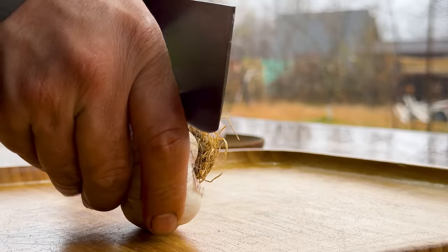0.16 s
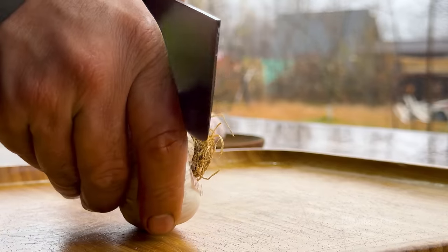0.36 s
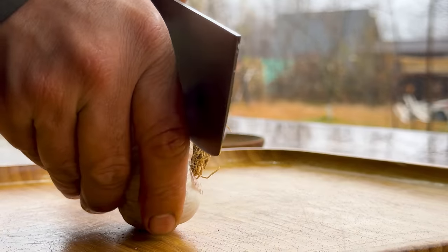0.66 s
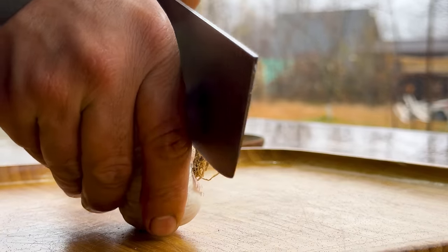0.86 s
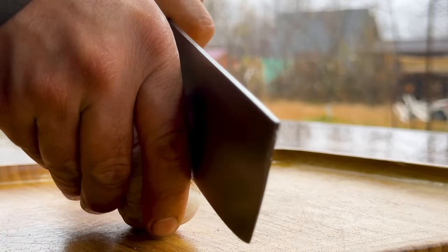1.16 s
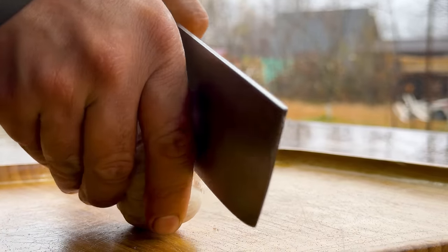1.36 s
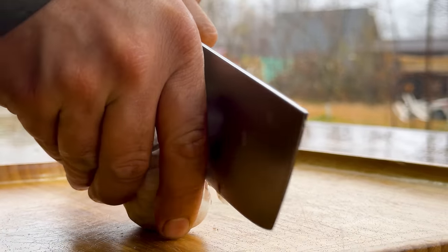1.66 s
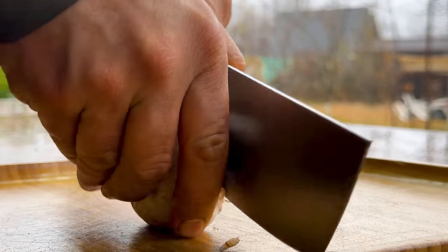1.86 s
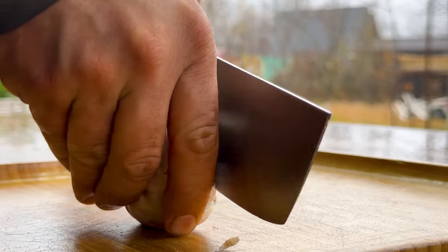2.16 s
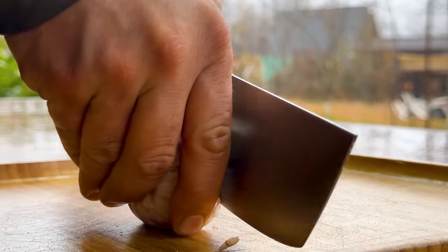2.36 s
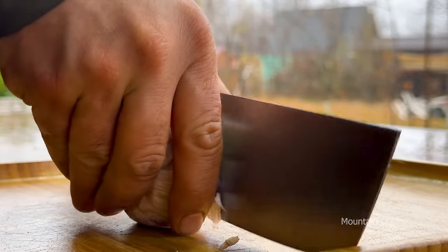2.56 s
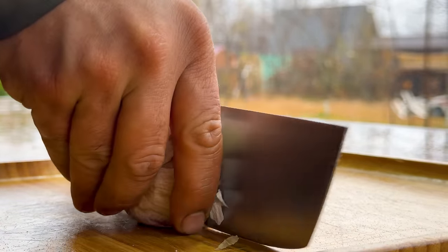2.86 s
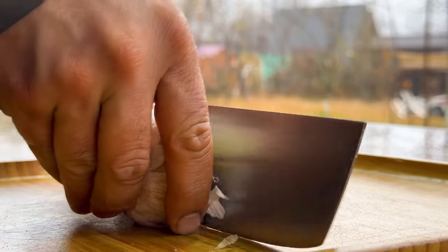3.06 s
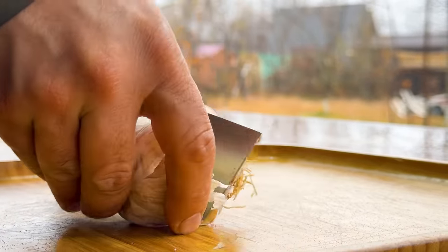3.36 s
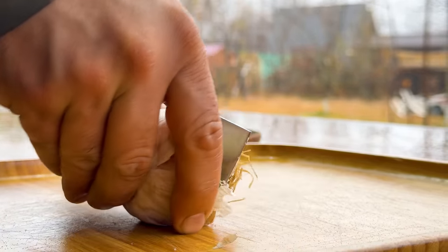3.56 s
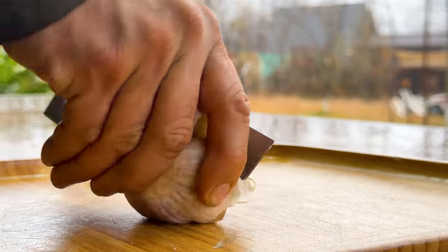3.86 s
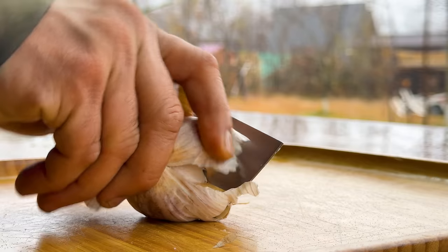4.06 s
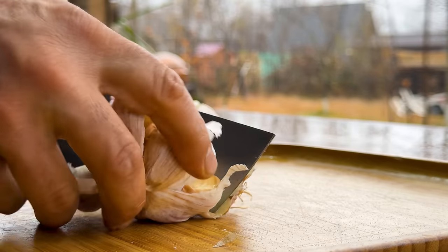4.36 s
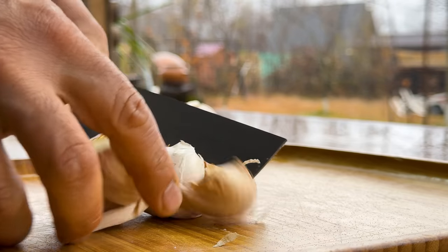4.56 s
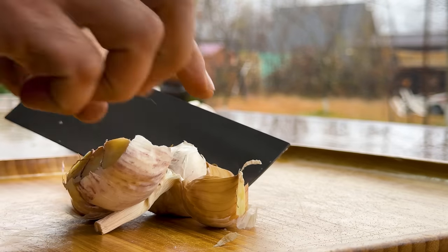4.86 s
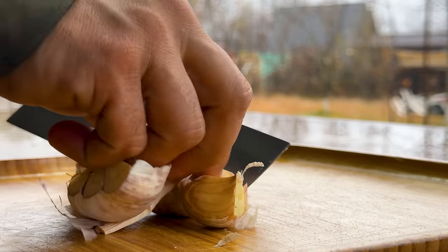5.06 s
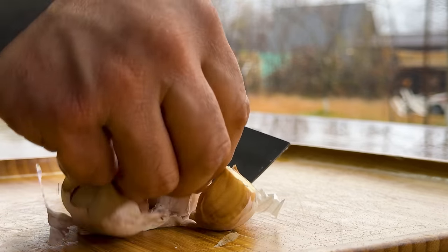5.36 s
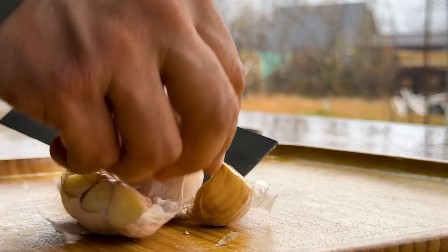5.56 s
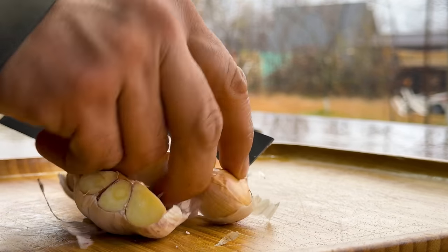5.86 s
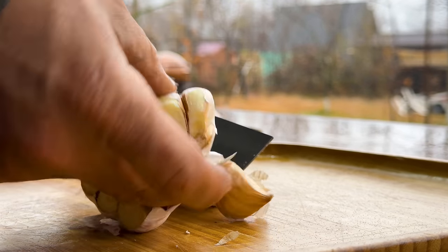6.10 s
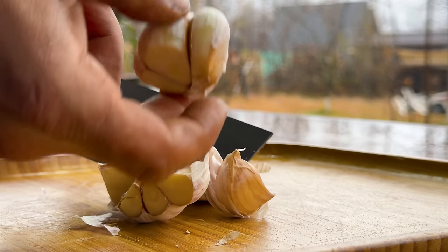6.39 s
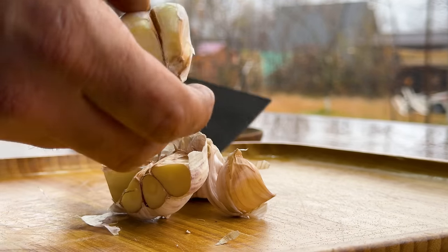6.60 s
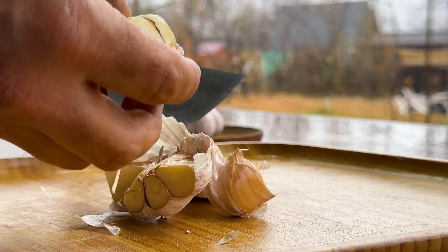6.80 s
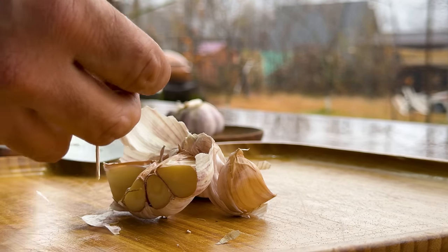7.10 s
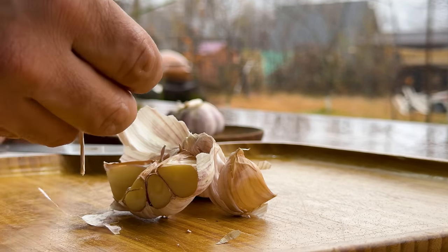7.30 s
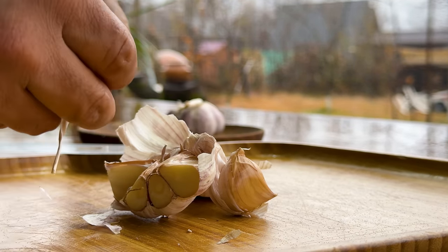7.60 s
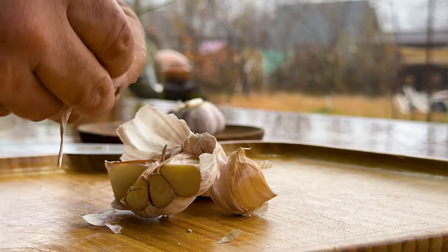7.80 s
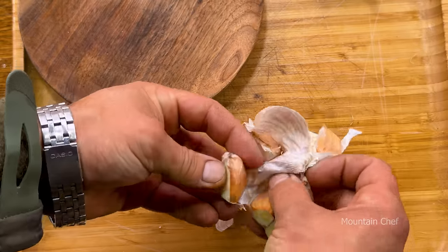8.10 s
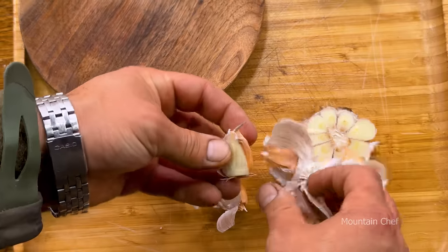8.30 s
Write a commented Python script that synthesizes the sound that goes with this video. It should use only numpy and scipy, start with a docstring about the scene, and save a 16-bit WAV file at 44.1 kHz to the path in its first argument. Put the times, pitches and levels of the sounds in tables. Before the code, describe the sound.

Faint brushing over dry skin opens the scene, then bursts of brittle crunching as a blade bites into garlic, thumping the wooden board beneath. The crackle peaks, thins into papery rustling and a few pops as fingers separate the head, then nearly stops. A knife is put down in a double clatter, followed by a crisp tear and hollow taps on wood. Close, dry and detailed, with only faint room hush.

```python
"""A faint brush over dry skin and a soft tap on wood open the scene, in a quiet room with the microphones close.
A broad knife is then worked down through a dry garlic head on a wooden board: skins crinkle (filtered fibre grains)
and snap (noise bursts with a ringing pop), cloves give way in dull thuds (damped sines), and the board knocks under
blade and handling (struck modes and dense noise). Fingers pull the head apart, the knife is laid aside with a clatter
of wood and steel modes, and soft hollow taps sound on the wood; filtered noise makes room hush and board rumble."""
import sys
import numpy as np
from scipy import signal
from scipy.fft import rfft, irfft, next_fast_len
from scipy.io import wavfile
from scipy.ndimage import uniform_filter1d, map_coordinates

SR = 44100
rng = np.random.default_rng(int(sys.argv[2]) if len(sys.argv) > 2 else 0)


def dump(signal):
    """Clip the signal to [-1, 1] and save it as 16-bit WAV at the path in sys.argv[1]."""
    limited = np.clip(np.atleast_2d(signal).T, -1, 1)
    pcm = np.round(limited * 32767).astype(np.int16)
    wavfile.write(sys.argv[1], SR, pcm)


N = 372204  # samples

# All event levels are relative dB, before the trims in the functions.
# Hush of the quiet room. Each row: frequency in Hz, gain in dB.
AIR_SPECTRUM = [(15, -43), (25, -5), (77, 0.5), (106, -9), (363, -14.5), (1460, -23), (3350, -28.5),
                (15000, -35)]
AIR_DB = -58
# Short answer of the room. Each row: frequency in Hz, time to fall 60 dB in seconds.
ROOM_DECAY = [(100, 0.2), (500, 0.092), (3000, 0.11), (12000, 0.061)]

# Weight of the hand on the board. Each row: time in seconds, level in dB.
HAND_WEIGHT = [(0.0, -59.5), (1.57, -54), (1.67, -49.5), (6.79, -61), (7.36, -56), (7.94, -62), (8.44, -55)]
# Low rumble of the loaded board. Each row: frequency in Hz, gain in dB.
RUMBLE_SPECTRUM = [(15, -30.5), (35, -19.5), (70, -1.5), (110, -7), (170, -8), (300, -33), (900, -63)]
# Creak of the loaded board. Each row: frequency in Hz, gain in dB.
CREAK_SPECTRUM = [(100, -21.5), (220, 2.5), (420, -4.5), (800, -7), (1400, -13), (4000, -19.5)]

# Cloves give way or shift on the board. Each row: start in seconds, level in dB, pitch in Hz.
CLOVE_THUDS = [(1.001, -29, 112.3), (1.043, -26.5, 116.6), (1.1, -28, 124), (1.134, -29, 122),
               (1.571, -33.5, 74), (1.714, -14, 107), (1.75, -23, 70), (1.789, -29, 108),
               (2.242, -29, 112.7), (2.412, -27, 112), (2.805, -24.5, 110), (2.986, -32.5, 82),
               (4.003, -38, 75), (4.07, -38, 85), (4.337, -34.5, 70), (4.572, -41, 199), (7.638, -37, 72),
               (8.345, -40.5, 80.2)]
# Soft hollow taps on the wood, from handling or from cloves put down.
# Each row: start in seconds, level in dB, brightness in Hz.
SOFT_TAPS = [(0.378, -38, 1360), (4.567, -25.5, 778), (4.617, -32, 640), (7.62, -40, 700),
             (8.08, -21.5, 865), (8.312, -17, 724), (8.337, -18, 594), (8.422, -30.5, 750)]
# The knife is laid down. Each row: start in seconds, level in dB, brightness in Hz, blade ring in dB.
KNIFE_LANDINGS = [(7.007, -22.5, 2990, -20), (7.016, -14, 870, -38), (7.027, -31.5, 3460, -38),
                  (7.187, -22.5, 2600, -39), (7.196, -16.5, 1000, -34), (7.229, -11, 4500, -42),
                  (7.234, -11, 3130, -42), (7.246, -17, 3280, -39), (7.262, -18, 2440, -37)]
# Knocks on the board: blade blows, their quick echoes from the board's edges, and low bumps of handling.
# Each row: start in seconds, level in dB, brightness in Hz, contact click in dB.
BOARD_KNOCKS = [(0.823, -38.5, 280, -29), (1.056, -25.5, 320, -21), (1.711, -24.5, 900, 7),
                (1.724, -15.5, 300, -4.5), (1.746, -27, 1190, -5), (2.412, -14.5, 2150, 12),
                (2.423, -15.5, 1180, -4), (2.8028, -12.5, 1280, 7), (2.8164, -17, 980, -19),
                (2.977, -30.5, 1120, 4)]

# Modes of the wood under a soft tap. Each row: frequency in Hz, level in dB, time to fall 60 dB in seconds.
TAP_MODES = [(385.5, -2.5, 0.12), (436, -2.5, 0.09), (562, -9, 0.077), (616, -4.5, 0.066),
             (807, 5.5, 0.013), (1086, -11, 0.039), (1700, -12, 0.032)]
# Modes of the knife on the table. Each row: frequency in Hz, level in dB, time to fall 60 dB in seconds.
KNIFE_MODES = [(204.5, -6.5, 0.14), (261, -9, 0.29), (401, 2, .11), (440, -8.5, 0.19), (619, 1, 0.07),
               (728, -6, 0.11), (823, 7, 0.06), (920, -5.5, 0.095), (1081, -6, 0.11), (1167, -8, 0.12),
               (1424, -1, 0.077), (1735, -7, 0.063), (1730, -3, 0.079), (2170, 0, 0.073),
               (2630, 3.5, 0.055), (2980, -6, 0.062), (3860, -1.5, .035), (11300, -6, 0.068),
               (14000, 11, 0.06)]
# Modes of the steel blade. Each row: frequency in Hz, level in dB, time to fall 60 dB in seconds.
BLADE_MODES = [(2670, 8, 0.37), (8900, -31, .4)]
# Modes of the board. Each row: frequency in Hz, level in dB, time to fall 60 dB in seconds.
BOARD_MODES = [(205.1, -5.5, 0.23), (265, -6, 0.2), (344, -7, 0.14), (423.4, -0.5, 0.11), (513, -16, 0.017),
               (611, 4, 0.062), (722, -2, 0.1), (822, -5, 0.041), (954, -2.5, 0.079), (1046, 5.5, 0.039),
               (1306, -4, 0.081), (1375, -2, 0.042), (2670, -9.5, .035)]
# Dense wash of weaker wood modes. Each row: frequency in Hz, gain in dB.
WOOD_SPECTRUM = [(50, -21), (110, 0.5), (200, 0), (400, -5), (1000, -1), (1700, 0), (2800, 4.5),
                 (6000, 0.5), (15000, -11.5)]
# Dying of that wash. Each row: frequency in Hz, time to fall 60 dB in seconds.
WOOD_DECAY = [(100, 0.32), (400, 0.18), (1000, 0.074), (3000, 0.054), (10000, 0.084)]
# Stereo width of wood sounds. Each row: frequency in Hz, side level in dB.
WOOD_WIDTH = [(120, -7), (260, -3.5), (500, -15.5), (1000, -5.5), (3000, -11), (8000, -23)]

# Blade or fingers slide smoothly over the skin.
# Each row: start in seconds, length in seconds, hiss in dB, husk rubbing in dB, load on the board in dB.
SKIN_SLIDES = [(0, 0.24, -65, -66, -75), (.7, 0.19, -61.5, -63.5, -68), (1.31, 0.24, -52, -60.5, -60.5),
               (2.11, 0.2, -55.5, -60, -57), (2.58, 0.12, -42.5, -53, -68), (3.05, 0.12, -44.5, -49.5, -50),
               (3.19, 0.078, -54, -65, -53.5), (4.12, 0.095, -48.5, -54, -60),
               (4.6, 0.21, -63, -62.5, -62.5), (4.84, 0.24, -49, -52.5, -57.5),
               (5.66, 0.12, -48, -54.5, -58), (6.08, 0.1, -59, -61, -63), (7.58, 0.19, -61.5, -69, -59)]
# Fingers pull at the skins. Each row: start in seconds, length in seconds, level in dB.
SKIN_PULLS = [(4.2, 0.15, -46), (4.39, .22, -51.5), (4.49, 0.029, -41.5), (4.72, 0.051, -57.5),
              (5.085, 0.052, -36), (5.18, .075, -48), (5.3, 0.062, -39.5), (5.44, 0.12, -54),
              (5.76, 0.32, -45.5), (5.81, 0.1, -42), (5.93, .11, -53), (6.19, 0.13, -49.5),
              (6.4, 0.26, -66.5), (7.84, 0.083, -47), (7.98, 0.43, -51.5), (8.075, 0.018, -48),
              (8.133, 0.017, -48), (8.3, 0.017, -47.5)]
# The knife bites into the head.
# Each row: start in seconds, length in seconds, crinkle in dB, husk rubbing in dB, load on the board in dB.
KNIFE_CUTS = [(1.034, 0.014, -35, -45.5, -36.5), (1.085, 0.044, -39, -55, -38),
              (1.15, 0.0083, -57, -70, -60), (1.55, 0.13, -44.5, -49, -45), (1.67, .03, -42, -42, -44),
              (1.708, 0.025, -34.5, -34.5, -33), (1.835, 0.053, -43, -49, -52),
              (1.92, 0.051, -42.5, -50, -51.5), (2.05, 0.037, -46.5, -52, -47),
              (2.225, 0.16, -42.5, -50, -43), (2.38, 0.081, -34.5, -40, -37.5),
              (2.55, 0.027, -35.5, -42.5, -66.5), (2.793, 0.052, -36, -39.5, -40),
              (2.87, 0.072, -47, -49, -54), (3.5, .21, -40.5, -43, -49), (3.735, 0.099, -40, -40.5, -49.5),
              (3.87, 0.058, -39, -40.5, -57), (3.95, 0.15, -45, -45, -50)]
# How a slide, pull or cut starts and dies away. Each pair: attack in seconds, release in dB per second.
SLIDE_SHAPE = (0.02, 205)
PULL_SHAPE = (0.0064, 269)
CUT_SHAPE = (0.0026, 343)
# Husk rubbing and board load of each pull, relative to its crinkle.
PULL_RUB_DB, PULL_LOAD_DB = -2, -17.5
# Fibres break in slow and quick clumps.
SLOW_CLUMP_DB, QUICK_CLUMP_DB = 2.1, 1.5

# Papery crinkle. Each row: frequency in Hz, gain in dB.
PAPER_SPECTRUM = [(300, -23), (1500, -19), (3000, -11), (5000, -3.5), (7300, 0.5), (11000, 3.5), (15000, 2)]
# Hollow husk. Each row: frequency in Hz, gain in dB.
HUSK_SPECTRUM = [(200, -25), (600, -4), (1100, -3), (1600, -7.5), (2300, 0.5), (3000, 4.5), (4000, 0),
                 (6000, 0), (12000, -35.5)]
# Sharp crack of a tear. Each row: frequency in Hz, gain in dB.
CRACK_SPECTRUM = [(150, -30.5), (600, -22), (2000, -13.5), (4500, -8.5), (7500, 2), (11000, 1),
                  (15000, -0.5)]

# A skin or stalk snaps loudly.
# Each row: time in seconds, crack in dB, husk ring in dB, husk pitch in Hz, tearing time in seconds.
LOUD_SNAPS = [(.826, -40, -57, 2993, .005), (.934, -41, -54, 3050, 0.0039),
              (.985, -31.5, -49, 4970, 0.0088), (1.035, -28, -45, 3460, .006), (1.17, -31, -53, 3030, .005),
              (1.443, -40, -69, 3000, 0.0027), (1.5547, -24.5, -28, 2900, 0.0047),
              (1.612, -18.5, -45, 4590, 0.0042), (1.6896, -15.5, -23, 3130, 0.0098),
              (1.709, -12.5, -20.5, 2470, 0.015), (1.746, -13, -18, 4770, .014),
              (1.9182, -20.5, -33.5, 5000, 0.0055), (1.9485, -42, -36.5, 4750, 0.0087),
              (2.2312, -28, -40, 2910, 0.0069), (2.2444, -24, -38, 2507, 0.0085),
              (2.3194, -22, -34.5, 2490, .005), (2.328, -25, -37, 2950, 0.0053),
              (2.3603, -22, -42, 2345, 0.005), (2.3776, -23, -38, 5000, 0.0061),
              (2.399, -14, -20.5, 2750, 0.018), (2.48, -26, -33, 4730, 0.0071),
              (2.55, -36, -32, 3100, 0.0073), (2.5655, -23, -27.5, 3240, 0.015),
              (2.8035, -17, -18, 2800, 0.0054), (2.8303, -22, -42, 3000, .005),
              (2.877, -26.5, -31, 3030, 0.012), (2.904, -25, -28.5, 3100, 0.0075),
              (3.304, -35.5, -41.5, 2760, 0.0043), (3.337, -34.5, -41, 2910, 0.0069),
              (3.4043, -42, -42.5, 3270, 0.0047), (3.4792, -28, -24.5, 2600, 0.0091),
              (3.59, -18.5, -26.5, 4660, 0.0036), (3.6177, -36, -23.5, 4870, 0.0047),
              (3.663, -22.5, -18, 2300, 0.0052), (3.741, -12.5, -22, 4700, 0.027),
              (3.76, -14, -24, 3040, .012), (3.801, -11, -21, 2756, 0.023),
              (3.8515, -17, -23, 2190, 0.0031), (3.8704, -24, -25, 3810, .004),
              (3.88, -21, -25.5, 2307, 0.0044), (3.939, -18.5, -28.5, 3910, .003),
              (4.0384, -22, -27, 4560, 0.0058), (4.0579, -19.5, -30, 3000, 0.0062),
              (4.0772, -25, -30, 3420, 0.017), (4.0917, -32, -28, 3550, .004),
              (4.1063, -34, -30, 1300, 0.0039), (5.1289, -24, -28.5, 3270, .01),
              (5.1597, -26.5, -30.5, 2675, 0.0067), (5.2975, -27.5, -28.5, 3420, 0.0059),
              (6.0417, -26, -31.5, 3000, 0.0038), (6.64, -49, -51.5, 3000, 0.0037),
              (6.838, -45, -78, 1850, .003), (7.899, -17, -26, 2270, 0.014),
              (8.079, -33, -32, 1735, 0.0077), (8.135, -28.5, -33.5, 3280, 0.013),
              (8.162, -24, -34.5, 1696, .014)]
# The skin sticks and slips in a quick run of snaps.
# Each row: start in seconds, length in seconds, slips per second, level in dB.
SLIP_RUNS = [(1.629, .055, 100, -28), (1.828, .052, 112, -26), (2.75, .045, 75, -30.5),
             (2.931, .14, 45, -38), (3.437, .1, 75, -34), (4.215, .09, 30, -35.5), (7.809, .025, 90, -44.5),
             (7.847, .045, 90, -42), (7.984, .08, 55, -37), (8.184, .06, 50, -38)]
# Timing scatter as a part of the slip period, level scatter, husk level relative to the crack.
SLIP_UNEVEN, SLIP_SCATTER_DB, SLIP_HUSK_DB = .3, 4, -9
# Chances of a small snap per second, kept only while the skins are worked; crack level above the work.
SMALL_CHANCES_PER_S, SMALL_SNAP_DB = 60, 1.5
# Level scatter, husk level relative to the crack.
SMALL_SCATTER_DB, SMALL_HUSK_DB = 6, -6
HUSK_HZ = 3030  # middle pitch of slips and small snaps

TOP_HZ = 15850  # upper limit of the microphones


def amp(db):
    """Decibels to gain."""
    return 10 ** (np.asarray(db) / 20)


def unit(x):
    """Scale to rms 1."""
    return x / np.sqrt(np.mean(x ** 2) + 1e-20)


def along(points, hz):
    """Read (Hz, value) points on a log frequency axis."""
    f, v = np.transpose(points)
    return np.interp(np.log(hz + 1), np.log(f + 1), v)


def curves(rows):
    """One value per sample for each column after the time."""
    s, *cols = np.transpose(rows)
    return [np.interp(np.arange(N) / SR, s, c) for c in cols]


def wobble(rate):
    """A smooth random curve with rate knots a second."""
    knots = rng.standard_normal(int(N * rate / SR) + 4)
    return map_coordinates(knots, [np.arange(N) * rate / SR])


def filtered(x, response):
    """x through a response of frequency."""
    n = x.shape[-1]
    m = next_fast_len(n + 4096)
    return irfft(rfft(x, m) * response(np.fft.rfftfreq(m, 1 / SR)), m)[..., :n]


def coloured(x, gain, size=2048):
    """x through the causal minimum-phase filter with this gain, so attacks stay sharp."""
    cepstrum = irfft(np.log(gain(np.fft.rfftfreq(size, 1 / SR)) + 1e-6))
    # folding the cepstrum onto positive times gives minimum phase
    cepstrum[1:size // 2] *= 2
    cepstrum[size // 2 + 1:] = 0
    impulse = irfft(np.exp(rfft(cepstrum)))
    return signal.fftconvolve(x, impulse[None], axes=1)[:, :x.shape[1]]


def spread(pair, side_db):
    """Left and right from a middle signal and a side signal at its own level."""
    mid, side = pair[0], amp(side_db) * pair[1]
    return np.array([mid + side, mid - side])


def wide(pair):
    """Left and right of wood, with a width that depends on frequency."""
    side = coloured(pair[1:], lambda hz: amp(along(WOOD_WIDTH, hz)))[0]
    return np.array([pair[0] + side, pair[0] - side])


def add(track, s, sound):
    """Mix a sound in at time s."""
    start = max(round(s * SR), 0)
    part = track[:, start:start + sound.shape[1]]
    part += sound[:, :part.shape[1]]


def strokes(rows, edges, column=2):
    """Gain of a row of strokes: each rises, holds for its length and dies away."""
    attack_s, release_db_per_s = edges
    t, gain = np.arange(SR) / SR, np.zeros((1, N))
    for row in rows:
        release = amp(-release_db_per_s * np.maximum(t - row[1], 0))
        shape = (1 - np.exp(-t / attack_s)) * release
        add(gain, row[0], amp(row[column]) * shape[None])
    return gain[0]


def dying_noise(t60s, size):
    """Two noises in which each frequency dies at its own speed."""
    hz, t, z = signal.stft(rng.standard_normal((2, size)), SR, nperseg=128)
    fade = amp(-60 * t / along(t60s, hz)[:, None])
    return signal.istft(z * fade, SR, nperseg=128)[1][:, :size]


def air():
    """The steady hush of the room: shaped noise."""
    hush = unit(filtered(rng.standard_normal((2, N)), lambda hz: amp(along(AIR_SPECTRUM, hz))))
    return amp(AIR_DB) * spread(hush, side_db=-11.5)


def room(x):
    """A short answer from the room: the sound convolved with dying noise."""
    tail = dying_noise(ROOM_DECAY, SR // 2)
    tail = tail / np.linalg.norm(tail[0])
    return signal.fftconvolve(x.mean(axis=0)[None], tail, axes=1)[:, :N]


def load():
    """The board rumbles and creaks under the leaning hand, and more with each stroke."""
    lean = amp(curves(HAND_WEIGHT)[0])
    push = strokes(KNIFE_CUTS, CUT_SHAPE, column=4) + strokes(SKIN_SLIDES, SLIDE_SHAPE, column=4)
    push = push + amp(PULL_LOAD_DB) * strokes(SKIN_PULLS, PULL_SHAPE)
    rumble = unit(filtered(rng.standard_normal((2, N)), lambda hz: amp(along(RUMBLE_SPECTRUM, hz))))
    uneven = rng.standard_normal((2, N)) * amp(2.8 * wobble(90))
    creak = unit(coloured(uneven, lambda hz: amp(along(CREAK_SPECTRUM, hz))))
    rumble_gain = np.hypot(lean, amp(-1.5) * push)
    creak_gain = np.hypot(amp(-3.5) * lean, amp(-.5) * push)
    return rumble_gain * spread(rumble, side_db=-12.0) + creak_gain * wide(creak)


def ring(modes, t, vary_db):
    """Two views of an object's decaying modes, struck at new strengths."""
    hz, db, t60 = np.transpose(modes)[:, :, None]
    gain = amp(db + vary_db * rng.standard_normal(hz.shape) - 60 * t / t60)
    phase = rng.random((2, len(modes), 1))
    return np.sum(gain * np.sin(2 * np.pi * (hz * t + phase)), axis=1)


def contact(hz, bright_hz):
    """A softer contact, with lower brightness, passes less treble."""
    return 1 / np.sqrt(1 + (hz / bright_hz) ** 5)


def wood_blow(modes, t, bright_hz, modes_db, dense_db):
    """A wooden slab answers with its main modes and a dense wash of weaker ones."""
    dense = coloured(dying_noise(WOOD_DECAY, len(t)), lambda hz: amp(along(WOOD_SPECTRUM, hz)))
    main = ring(modes, t, vary_db=1.2)
    return coloured(amp(modes_db) * main + amp(dense_db) * dense, lambda hz: contact(hz, bright_hz))


def taps():
    """Soft contacts, from handling or cloves put down, sound the wood modes as small hollow taps."""
    out, t = np.zeros((2, N)), np.arange(SR // 4) / SR
    for s, db, bright_hz in SOFT_TAPS:
        body = wood_blow(TAP_MODES, t, bright_hz, modes_db=-9, dense_db=0)
        add(out, s, amp(db) * spread(body, side_db=-14))
    return out


def clatter():
    """The knife strikes the table several times as it is laid down; wood and thin steel modes ring."""
    out, t = np.zeros((2, N)), np.arange(SR // 2) / SR
    for s, db, bright_hz, ring_db in KNIFE_LANDINGS:
        steel = amp(-11) * ring(BLADE_MODES, t, vary_db=1)
        wood = wood_blow(KNIFE_MODES, t, bright_hz, modes_db=-10.0, dense_db=2.5)
        add(out, s, amp(db - 2.0) * wide(wood + amp(ring_db) * steel))
    return out


def thuds():
    """Each sudden yielding or shift of the cloves pushes the board into a damped low swing."""
    out, t = np.zeros((2, N)), np.arange(SR // 4) / SR
    for s, db, pitch_hz in CLOVE_THUDS:
        onset = (1 - np.exp(-t / 0.0047)) ** 2
        swing = np.sin(2 * np.pi * pitch_hz * t) * amp(-60 * t / 0.11) * onset
        add(out, s, amp(db + 7.0) * swing * amp([[-2.5], [2.2]]))  # stronger on the right
    return out


def knocks():
    """Blade blows, their edge echoes and handling bumps: each a short push with the ringing of the wood."""
    out, t = np.zeros((2, N)), np.arange(SR // 3) / SR
    for s, db, bright_hz, click_db in BOARD_KNOCKS:
        push = np.sin(2 * np.pi * bright_hz * t) * np.exp(-t * bright_hz)
        body = wood_blow(BOARD_MODES, t, bright_hz, modes_db=-8, dense_db=4.5)
        add(out, s, amp(db) * (wide(body) + amp(click_db + 1.5) * push))
    return out


def grains(rate, pitch_hz, cycles, scatter_db, size=64):
    """Two streams of tiny fibre breaks, each a damped sine of its own pitch and strength."""
    count = int(rate * N / SR)
    when, strength, phase, other = rng.random((count, 4)).T
    hz = np.clip(pitch_hz * np.exp(0.5 * rng.standard_normal(count)), 500, SR / 2.2)[:, None]
    turns = hz * np.arange(size) / SR
    level = amp(scatter_db * np.minimum(-np.log(1 - strength), 5))
    fade = level[:, None] * np.exp(-turns / cycles)
    at = ((when * N).astype(int)[:, None] + np.arange(size)).ravel()
    streams = []
    for p in (phase, other):
        breaks = fade * np.sin(2 * np.pi * (turns + p[:, None]))
        streams.append(np.bincount(at, breaks.ravel(), N)[:N])
    return np.array(streams)


def patchy(x, depth_db):
    """Each flake of skin favours its own pitches for a moment: a smoothed random gain field."""
    z = signal.stft(x, nperseg=512)[2]
    field = uniform_filter1d(rng.standard_normal(z.shape[1:]), size=5, axis=0)
    field = uniform_filter1d(field, size=6, axis=1)
    return signal.istft(z * amp(depth_db * unit(field)), nperseg=512)[1][:, :N]


def skins():
    """Dry skins crinkle in clumps under knife and fingers, and hiss evenly where these only slide."""
    cut, pull = strokes(KNIFE_CUTS, CUT_SHAPE), strokes(SKIN_PULLS, PULL_SHAPE)
    clumps = amp(SLOW_CLUMP_DB * wobble(70) + QUICK_CLUMP_DB * wobble(330) - 0.93)

    paper = grains(rate=4500, pitch_hz=9300, cycles=0.58, scatter_db=2.5)
    paper = coloured(paper, lambda hz: amp(along(PAPER_SPECTRUM, hz)))
    crinkle = spread(unit(patchy(paper, depth_db=3.0)), side_db=-40)
    husk = grains(rate=3000, pitch_hz=2790, cycles=0.84, scatter_db=1.5)
    husk = coloured(husk, lambda hz: amp(along(HUSK_SPECTRUM, hz)))
    rub = spread(unit(patchy(husk, depth_db=3.0)), side_db=-16)

    crinkle_gain = np.hypot(clumps * np.hypot(cut, pull), strokes(SKIN_SLIDES, SLIDE_SHAPE))
    rough_rub = np.hypot(strokes(KNIFE_CUTS, CUT_SHAPE, column=3), amp(PULL_RUB_DB) * pull)
    smooth_rub = strokes(SKIN_SLIDES, SLIDE_SHAPE, column=3)
    rub_gain = np.hypot(clumps * rough_rub, smooth_rub)
    return amp(0.77) * crinkle_gain * crinkle + amp(-0.45) * rub_gain * rub


def small_snaps():
    """Lesser snaps come at random while the skins are worked, stronger the harder the work."""
    work = np.hypot(strokes(KNIFE_CUTS, CUT_SHAPE), strokes(SKIN_PULLS, PULL_SHAPE))
    work_db = 20 * np.log10(work + 1e-9)
    rows, idle_db = [], -68
    for when, size, hollow, pitch in rng.random((int(SMALL_CHANCES_PER_S * N / SR), 4)):
        level_db = work_db[int(when * N)]
        if level_db > idle_db:
            crack_db = level_db + SMALL_SNAP_DB + SMALL_SCATTER_DB * (2 * size - 1)
            husk_db = crack_db + SMALL_HUSK_DB + SMALL_SCATTER_DB * (2 * hollow - 1)
            rows.append((when * N / SR, crack_db, husk_db, HUSK_HZ * 2 ** (pitch - .5), .004))
    return rows


def slips():
    """Each run of skin catches and lets go at a nearly even rate."""
    rows = []
    for start, length, rate, db in SLIP_RUNS:
        for k, (late, size, hollow, pitch) in enumerate(rng.uniform(-1, 1, (16, 4))):
            if k / rate <= length:
                s = start + (k + SLIP_UNEVEN * late * (k > 0)) / rate
                crack_db = db + SLIP_SCATTER_DB * size
                husk_db = db + SLIP_HUSK_DB + SLIP_SCATTER_DB * hollow
                rows.append((s, crack_db, husk_db, HUSK_HZ * 2 ** (pitch / 2), .007))
    return rows


def snaps(size=1024):
    """A tear runs through a skin in a few milliseconds and rings the hollow husk around it."""
    out, t = np.zeros((2, N)), np.arange(size) / SR

    def sized(x):
        """Scale to the energy of a 1.5 ms burst of rms 1."""
        return x / np.sqrt(np.sum(x[0] ** 2) / (.0015 * SR))

    for s, crack_db, husk_db, pitch_hz, tear_s in list(LOUD_SNAPS) + slips() + small_snaps():
        burst = (1 - np.exp(-t / (.2 * tear_s))) ** 2 * amp(-60 * t / tear_s)
        tear = burst + amp(-42 - 60 * t / .02)  # with a weak, slower tail
        crack = coloured(rng.standard_normal((2, size)) * tear, lambda hz: amp(along(CRACK_SPECTRUM, hz)))
        rasp = coloured(rng.standard_normal((2, size)) * tear, lambda hz: amp(along(HUSK_SPECTRUM, hz)))
        pop = np.sin(2 * np.pi * pitch_hz * t) * amp(-60 * t / 0.0071) * np.ones((2, 1))
        husk = sized(1.04 * sized(rasp) + sized(pop))
        snap = amp(crack_db - 0.25) * sized(crack) + amp(husk_db + 2.98) * husk
        add(out, s - tear_s / 10, spread(snap, side_db=-16.0))
    return out


def scene():
    """All the work on the board, with a little room."""
    direct = load() + thuds() + taps() + clatter() + knocks() + skins() + snaps()
    return air() + amp(-19.5) * room(direct) + direct


def record(dry):
    """The microphones drop the deepest bass and the top; their high treble reaches the left side later."""
    low_cut_hz = 35
    thin = signal.sosfilt(signal.butter(2, low_cut_hz, "high", fs=SR, output="sos"), dry)
    split_hz, lag_s = 7900, .000317

    def response(hz):
        """Steep top limit; above the split each side shifts by half the lag, in opposite directions."""
        turn = np.pi * lag_s * np.maximum(hz - split_hz, 0) * np.array([[1], [-1]])
        return np.exp(-1j * turn) / np.sqrt(1 + (hz / TOP_HZ) ** 200)

    return filtered(thin, response)


dry = scene()
out = record(dry)
dump(out)
```